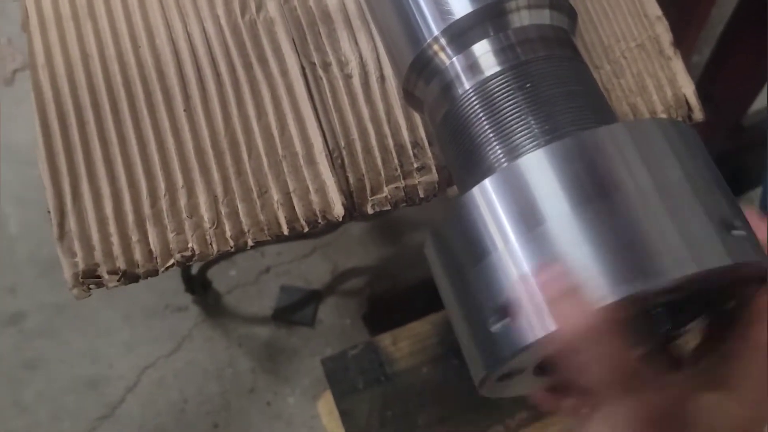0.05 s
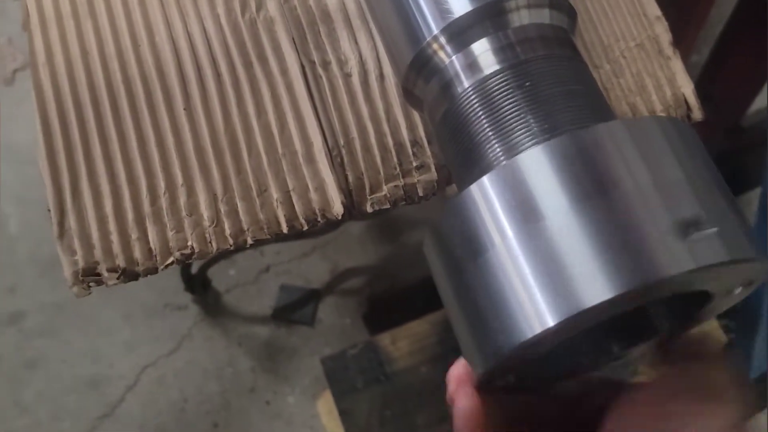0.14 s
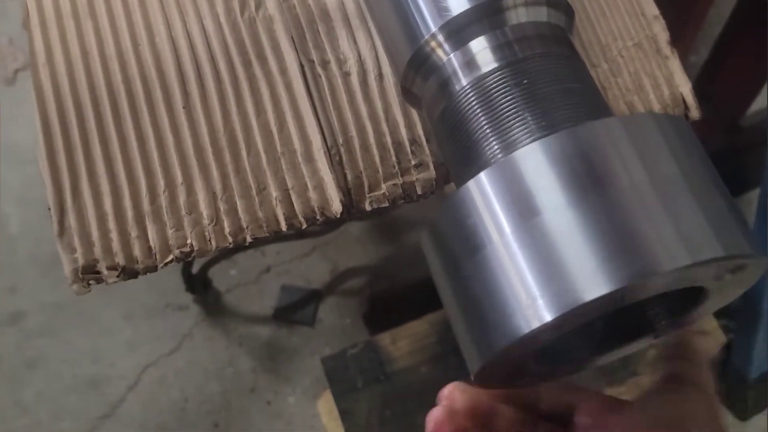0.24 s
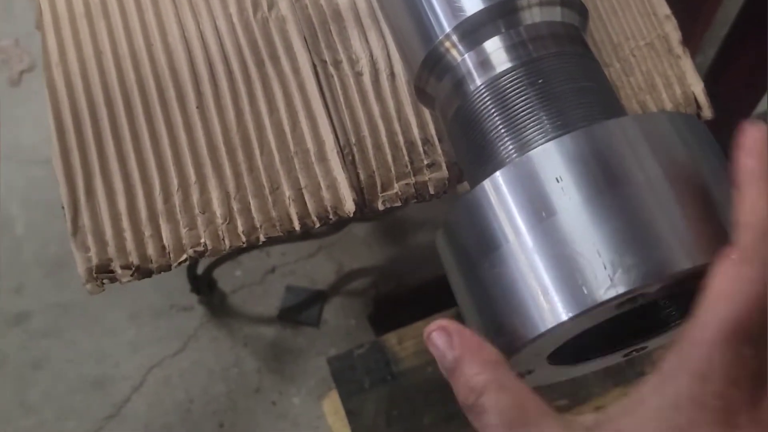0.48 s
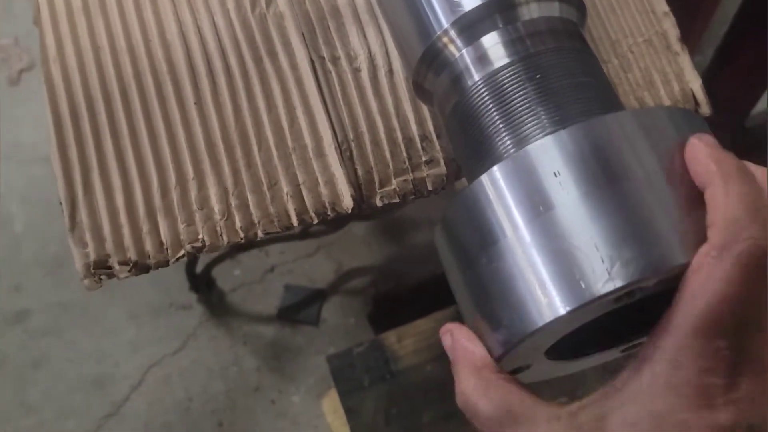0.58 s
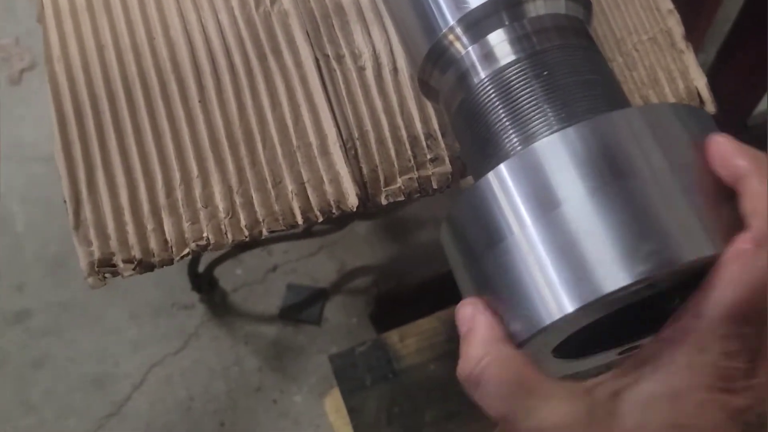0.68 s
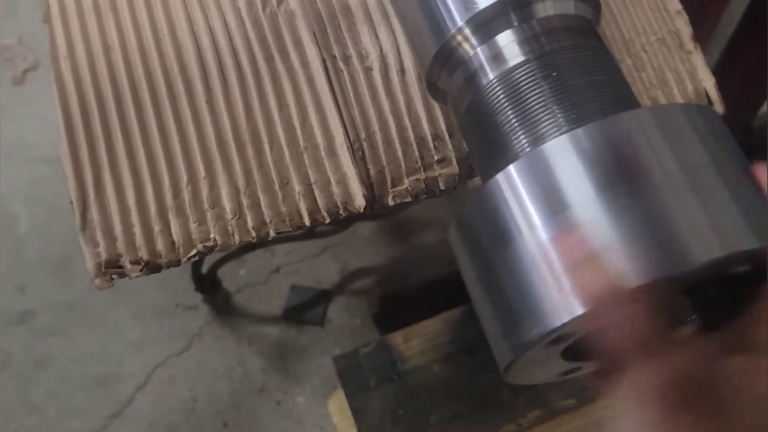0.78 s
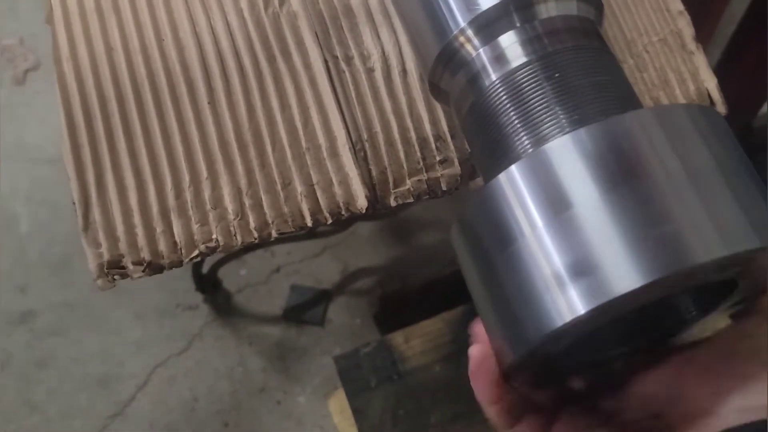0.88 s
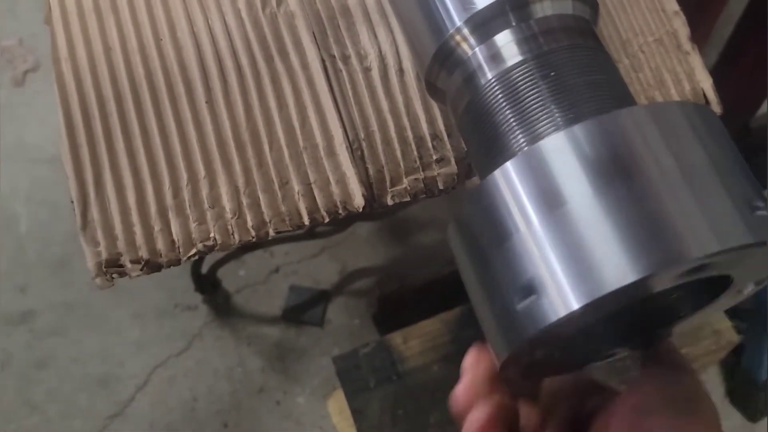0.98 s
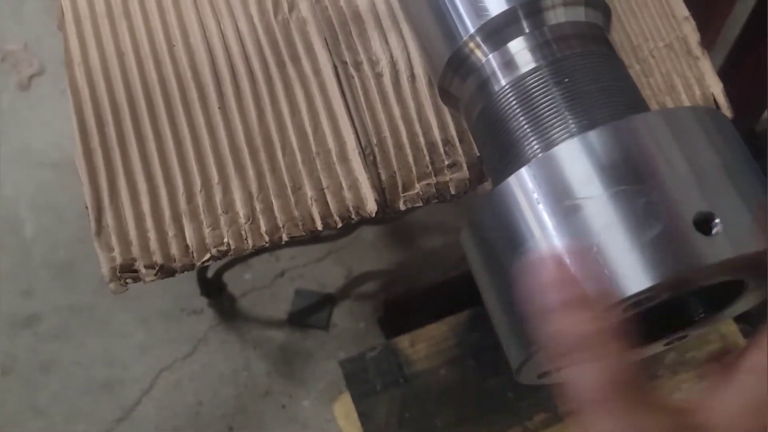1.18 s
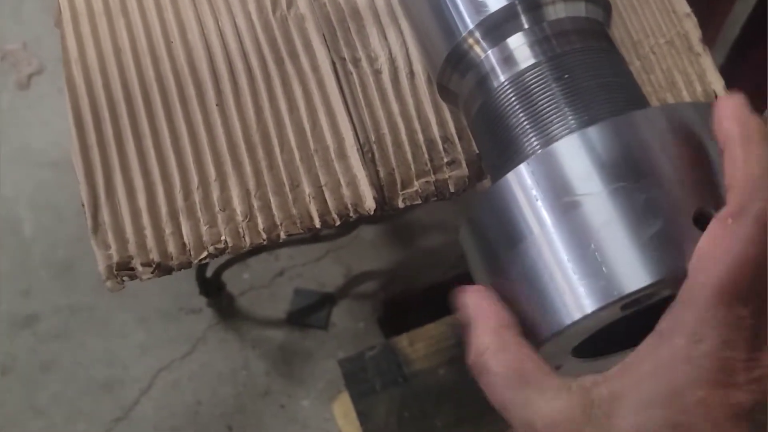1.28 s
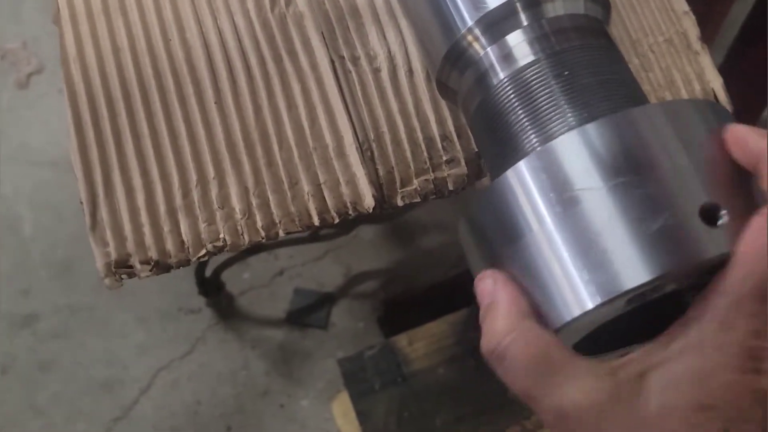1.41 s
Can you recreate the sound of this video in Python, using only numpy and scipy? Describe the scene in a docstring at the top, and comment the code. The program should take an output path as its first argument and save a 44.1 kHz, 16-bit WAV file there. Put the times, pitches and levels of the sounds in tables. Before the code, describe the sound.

Steel nut scraping round coarse threads in two quick hand turns, with a metallic clunk, close up

```python
"""A workshop rumbles throughout under a steady hiss while a large steel nut is spun twice by hand on a threaded
shaft, heard close. In each push rough threads scrape as dense grains of noise, which ring the steel modes; the
moving bore resonance colours them. Late in each push one mode sings as a wavering sine. At the end of the first
push the nut knocks on the flanks: filtered impulses ring the modes, with a noise crack and a low thud. One
faint knock falls in the second push, and a few dry noise ticks lie around it. The hand grips the nut after each
push and stills the long ringing; a short room answers the nut."""
import sys
import numpy as np
from scipy import signal
from scipy.fft import rfft, irfft, next_fast_len
from scipy.io import wavfile
from scipy.ndimage import uniform_filter1d, map_coordinates

SR = 44100
rng = np.random.default_rng(int(sys.argv[2]) if len(sys.argv) > 2 else 0)


def persist_wave(psi):
    """Save psi, clipped to +-1, as 16-bit WAV."""
    counts = np.round(np.clip(psi, -1, 1) * 32767).astype(np.int16)
    wavfile.write(sys.argv[1], SR, np.atleast_2d(counts).T)


N = 63945


def amp(db):
    """Turn decibels into a linear gain."""
    return 10 ** (np.asarray(db) / 20)


def unit(x):
    """Scale to an RMS of 1."""
    return x / np.sqrt(np.mean(x ** 2) + 1e-20)


def along(points, hz):
    """Read a curve of (Hz, value) points on a log frequency axis."""
    f, v = np.transpose(points)
    return np.interp(np.log(hz + 1), np.log(f + 1), v)


def curves(rows):
    """Draw one value per sample for each column after the time in seconds."""
    s, *cols = np.transpose(rows)
    return [np.interp(np.arange(N) / SR, s, c) for c in cols]


def wobble(rate):
    """A smooth random curve with `rate` knots a second."""
    knots = rng.standard_normal(int(N * rate / SR) + 4)
    return map_coordinates(knots, [np.arange(N) * rate / SR])


def filtered(x, response):
    """Multiply the spectrum of x by a complex response of frequency."""
    m = next_fast_len(N + SR)
    return irfft(rfft(x, m) * response(np.fft.rfftfreq(m, 1 / SR)), m)[..., :N]


def threads():
    """Rough threads scrape: grit drives the modes, the bore and a broad scrape, with a treble fizz of noise on top."""
    # The two pushes. Each row: time in seconds, level in dB, share of the bore in dB,
    # level of the treble in dB, share of the long-ringing modes in dB.
    pushes = [(0, -77, 12, -29, -9), (.06, -59.5, 3, -8.5, -5), (.12, -49, 4.5, -4, 0),
              (.16, -45.5, 10.5, 2.5, -18), (.205, -50, 3.5, 10, 9.5), (.225, -34.5, -23, -0.5, -0.5),
              (.27, -42, 1.5, -9, -4.5), (.34, -48, 0, -10, -2.5), (.43, -67.5, -20, -4, -22),
              (.68, -73.5, -20.5, -4, -13), (.78, -61, -22, -12, -0.5), (.84, -51.5, -2, -1, -2),
              (.9, -45, 6.5, -3, -9.5), (.94, -48, 4.5, 8.5, 2.5), (.97, -44.5, 3.5, 9, -8),
              (1.0, -44, 4, 7.5, -1.5), (1.05, -42, 2, -4, -8.5), (1.11, -51, -13, 1, 3),
              (1.18, -58, 3.5, -13, -3), (1.26, -74.5, -6.5, -10.5, 4), (1.45, -81, -6, -9, 11.5)]
    # Resonance of the bore, half covered by the hand. Each row: time in seconds, centre in Hz.
    bore_path = [(0, 1080), (.11, 1060), (.15, 980), (.19, 1081), (.4, 1150), (.78, 998), (.84, 1222),
                 (.91, 962), (.965, 777), (1.0, 990), (1.055, 1168), (1.45, 1194)]
    # Colour of the scrape between the modes. Each row: frequency in Hz, relative level in dB per Hz.
    scrape_colour = [(88, -48), (150, -28), (518, -24), (622, -8), (710, -12), (1040, -2.5), (1540, -13.5),
                     (5790, -32.5), (7800, -45), (10100, -81.5), (17200, -120)]
    # Colour of the treble fizz. Each row: frequency in Hz, relative level in dB per Hz.
    fizz_colour = [(4590, -33), (7800, -11.5), (10100, -6.5), (13400, -7.5), (14600, 3), (15700, -1.5)]
    ring_db, scrape_db, fizz_db, bore_mix_db = -37, -2, -31, -3
    flutter_db, patchy_db, bore_width_hz = 1.2, 2.2, 130

    level_db, bore_db, treble_db, long_db = curves(pushes)
    push = amp(level_db + flutter_db * wobble(40))

    short_ring = filtered(push * grit(patchy_db), lambda f: modes(f, column=2, long=False))
    long_force = push * amp(long_db) * grit(patchy_db=1.0)
    long_ring = free() * filtered(long_force, lambda f: modes(f, column=2, long=True))
    ring = short_ring + long_ring

    scrape = filtered(grit(patchy_db), lambda f: amp(along(scrape_colour, f)) * (f < 8000))
    scrape = push * unit(scrape)

    fizz = filtered(rng.standard_normal(N), lambda f: amp(along(fizz_colour, f)) * (f > 7800))
    fizz = amp(level_db + treble_db) * unit(fizz)

    # The bore is a resonance peak that glides over short-time spectra of fresh grit.
    f, t, z = signal.stft(grit(patchy_db=2.5), SR, nperseg=1024, noverlap=896)
    centre = np.interp(t, *np.transpose(bore_path))
    peak = 1 / (1 + (2 * (f[:, None] - centre) / bore_width_hz) ** 2)
    hollow = signal.istft(z * peak, SR, nperseg=1024, noverlap=896)[1][:N]
    hollow = amp(bore_mix_db + bore_db) * push * unit(hollow)
    return amp(ring_db) * ring + amp(scrape_db) * scrape + amp(fizz_db) * fizz + hollow


def grit(patchy_db):
    """Dense tiny collisions of rough steel, stronger now in one band, now in another."""
    grains_per_s, grain_spread_db = 6000, 3
    hit = rng.random(N) < grains_per_s / SR
    strength = amp(grain_spread_db * rng.standard_normal(N)) * rng.standard_normal(N)
    z = signal.stft(hit * strength, nperseg=512)[2]
    field = uniform_filter1d(rng.standard_normal(z.shape), size=4, axis=0)  # smooth over frequency
    field = uniform_filter1d(field, size=4, axis=1)  # smooth over time
    return unit(signal.istft(z * amp(patchy_db * unit(field)), nperseg=512)[1][:N])


def modes(f, column, long, low_db=0):
    """Sum the response of the long-ringing steel modes or of the others; column 2 is rubbed, 3 knocked."""
    # Modes of nut and shaft. Each row: frequency in Hz, t60 in seconds,
    # relative level when rubbed in dB (before the decay scaling below), relative level when knocked in dB.
    steel = [(207.1, 0.17, -13.5, -45.5), (613.5, 0.095, -3.5, -7.5), (651, 0.0874, -13, -9.5),
             (1060, 0.022, -17.5, -1), (1200, 0.064, -9.5, -8), (1346, 0.14, -14.5, -21.5),
             (1667, 0.021, -21, -27), (1782.5, 0.092, -9.5, -13.5), (1959, 0.092, -11, 3),
             (2218, 0.38, -16.5, -23.5), (2523, .14, -27.5, -20.5), (2749, .15, -17, -19),
             (3000, .03, -23, -11.5), (3280, 0.037, -28, -24), (3417, 1.1, -23.5, -32.5),
             (3507, 0.043, -17.5, -4), (4220, .02, -38.5, -13.5), (4380, 0.068, -19.5, -12.5),
             (5200, .06, -29.5, -32), (5620, 0.16, -23, -49), (5887, 0.036, -20, -13),
             (6926, .14, -24.5, -20), (7135, 0.14, -29.5, -43.5), (15100, .08, -36, -63)]
    # Which modes ring on once the hand lets go. Each row: frequency in Hz, 1 for long-ringing or 0 for not.
    rings_on = [(200, 1), (700, 1), (900, 0), (1955, 0), (2222, 1), (2510, 0), (2730, 0), (3415, 1),
                (3540, 0)]
    low_hz = 700
    total = 0
    for k, mode in enumerate(steel):
        hz, t60 = mode[:2]
        if (along(rings_on, hz) > .5) != long:
            continue
        gain = (-1) ** k * amp(mode[column] + low_db * (hz < low_hz))  # neighbours alternate in sign
        if column == 2:
            gain = gain / np.sqrt(t60)  # under steady rubbing, evens out slow and fast decays
        total = total + gain * ringing(f, hz, t60)
    return total


def ringing(f, hz, t60):
    """A damped resonance whose answer to a unit blow starts at amplitude 1."""
    width_hz = np.log(1000) / (np.pi * t60)
    return SR / np.pi * 1j * f / (hz * hz - f * f + 1j * f * width_hz)


def free():
    """Gain of the long ringing: the closing hand stills it, and 0.25 s after each grip starts it is free again."""
    # Moments in seconds when the hand closes on the nut.
    grips = [.48, 1.225]
    grip_s = 0.024  # time to close
    t = np.arange(N) / SR
    return 1 - sum(np.clip((t - s) / grip_s, 0, 1) * (t < s + .25) for s in grips)


def singing():
    """Late in each push the nut sings on one mode, a clear, slightly wavering sine, until it is gripped."""
    # Each row: start in seconds, level in dB, fall in dB per second.
    songs = [(0.156, -50.5, 60), (.965, -55.5, 55)]
    sing_hz, rise_s = 2222, .02
    t = np.arange(N) / SR
    swell = np.zeros(N)
    for s, db, fall in songs:
        since = np.abs(t - s)
        sounding = (t > s) * (t < s + .4)
        swell += sounding * (1 - np.exp(-since / rise_s)) * amp(db - fall * since)
    tone = np.sin(2 * np.pi * sing_hz * t + .4 * wobble(20))
    return free() * swell * amp(2.5 * wobble(25)) * tone


def knocks():
    """Each blow, the softer the duller, rings the modes, cracks and, a moment later, thuds the stand."""
    # Knocks of the flanks. Each row: time in seconds, strength in dB, softness as a corner in Hz,
    # extra on the long-ringing modes below 700 Hz in dB, crack relative to the strength in dB.
    blows = [(.217, -11.5, 487, -3.5, -3.5), (.2215, -30, 489, 9, -10.5), (0.2359, -26.5, 6000, -14.5, 7.5),
             (0.2371, -13.5, 2374, -19.5, -13.5), (.2465, -29.5, 703, 8, -3.5), (0.891, -34, 810, -29, 1)]
    crack_rise_s, crack_t60_s = .001, 0.075
    thud_db, thud_hz, thud_t60_s, thud_late_s = -26, 65.7, 1.7 / 22, .012
    top_hz = 7040  # corner of the steep treble cut on all blows

    def thud(f):
        """A late low resonance, darkened above its own pitch."""
        late = np.exp(-2j * np.pi * f * thud_late_s)
        return amp(thud_db) * ringing(f, thud_hz, thud_t60_s) * late / (1 + 1j * f / thud_hz)

    impulse = np.eye(1, N)[0]
    out = np.zeros(N)
    for s, db, corner_hz, low_db, crack_db in blows:
        soft = lambda f: amp(db) / (1 + 1j * f / corner_hz) ** 2
        blow = filtered(impulse, lambda f: soft(f) * np.exp(-2j * np.pi * f * s))
        out += filtered(blow, lambda f: modes(f, column=3, long=False) + thud(f))
        out += free() * filtered(blow, lambda f: modes(f, column=3, long=True, low_db=low_db))
        crack = amp(crack_db) * burst(s, crack_rise_s, crack_t60_s)
        band = lambda f: 1 / (1 + 1j * f / 4500) ** 2 * 1j * f / (300 + 1j * f)
        out += filtered(crack, lambda f: soft(f) * band(f))
    return signal.sosfilt(signal.butter(6, top_hz, fs=SR, output="sos"), out)


def burst(s, rise_s, t60):
    """Noise that rises quickly at s and dies away."""
    u = np.clip(np.arange(N) / SR - s, 0, 1)
    return (1 - np.exp(-u / rise_s)) * amp(-60 * u / t60) * rng.standard_normal(N)


def ticks():
    """Faint dry ticks: short bright puffs of noise."""
    # Each row: time in seconds, level in dB before the bass is cut.
    puffs = [(.43, -67.5), (1.2, -66.5), (1.368, -63.5), (1.422, -69)]
    rise_s, t60_s = .008, .08
    noise = sum(amp(db) * burst(s, rise_s, t60_s) for s, db in puffs)
    return filtered(noise, lambda f: f > 2500)


def room(x):
    """A stereo noise tail in which each frequency dies at its own speed."""
    # Decay of the room. Each row: frequency in Hz, t60 in seconds.
    decay = [(200, 0.83), (1000, 0.29), (3000, 0.17), (8000, 0.17)]
    hz, t, z = signal.stft(rng.standard_normal((2, SR // 2)), SR, nperseg=256)
    tail = signal.istft(z * amp(-60 * t / along(decay, hz)[:, None]), SR, nperseg=256)[1]
    tail = tail / np.linalg.norm(tail[0])
    late = np.pad(x, (200, 0))  # the answer starts 200 samples later
    return signal.fftconvolve(late[None], tail, axes=1)[:, :N]


def shop():
    """Rumble of the workshop under a steady hiss: coloured stereo noise, lumpy in the bass."""
    # Colour of the background. Each row: frequency in Hz, relative level in dB per Hz.
    shop_colour = [(13, -47.5), (22, -24.5), (59, 4.5), (97, -5.5), (168, -13), (198, -27.5), (353, -8.5),
                   (647, -22.5), (784, -20.5), (1400, -28), (3100, -24.5), (3560, -29.5), (4310, -28),
                   (8340, -49.5), (15700, -48)]
    # Its course. Each row: time in seconds, level in dB, extra on the middle band in dB.
    course = [(0, -57.5, -6), (.4, -57.5, -4), (.7, -58, 1), (1.2, -56.5, -3.5), (1.3, -59, -7.5),
              (1.45, -59.5, -4.5)]
    # Stereo width. Each row: frequency in Hz, left-right likeness (1 is mono).
    likeness = [(60, 0.96), (130, 0.26), (290, 0.27), (640, 1), (1410, 0.08), (3100, 0.21), (6820, 0.14),
                (15000, 0.815)]
    lumps_db = 2.5
    level_db, middle_db = curves(course)

    def mid_side(f):
        """Split the colour into mid and side so that left and right are as alike as the table says."""
        turn = np.arccos(np.clip(along(likeness, f), -1, 1)) / 2
        return amp(along(shop_colour, f)) * (f > 18) * np.array([np.cos(turn), np.sin(turn)])

    mid, side = filtered(rng.standard_normal((2, N)), mid_side)
    pair = unit(np.array([mid + side, mid - side]))
    bass = filtered(pair, lambda f: 1 / (1 + (f / 150) ** 4))
    hiss = filtered(pair, lambda f: f > 5000)
    middle = pair - bass - hiss
    lumpy_bass = bass * amp(lumps_db * wobble(10.19))
    return amp(level_db) * (lumpy_bass + middle * amp(middle_db) + hiss)


def scene():
    """Place the nut between left and right by level and phase, then add its room and the workshop."""
    # Level balance of the nut. Each row: frequency in Hz, left over right in dB.
    lean = [(60, -2), (110, 2.5), (200, -1.5), (380, 0), (700, -4), (1290, 5), (2380, 8), (4400, 3.5),
            (8120, 1), (15000, 5)]
    # Phase balance of the nut. Each row: frequency in Hz, lead of the left in radians.
    lead = [(60, 0.52), (300, -.5), (700, -1), (1300, -2.2), (2200, -1.04), (4500, -2), (7000, -1.26),
            (9000, 0.8), (15000, -0.45)]
    room_db = -9.5
    nut = threads() + singing() + knocks() + ticks()
    half = np.array([[.5], [-.5]])  # left takes half of each difference, right the opposite half
    direct = filtered(nut, lambda f: amp(half * along(lean, f)) * np.exp(1j * half * along(lead, f)))
    answer = amp(room_db) * room(filtered(nut, lambda f: f > 150))
    return direct + answer + shop()


def record(dry):
    """Keep nothing above the band limit of 15780 Hz."""
    return filtered(dry, lambda hz: hz < 15780)


dry = scene()
out = record(dry)
persist_wave(out)
```